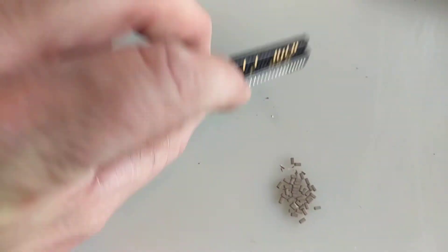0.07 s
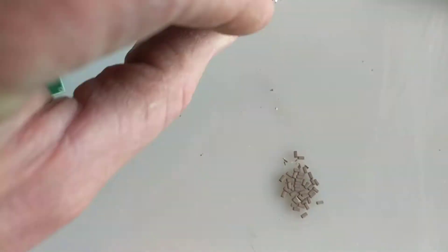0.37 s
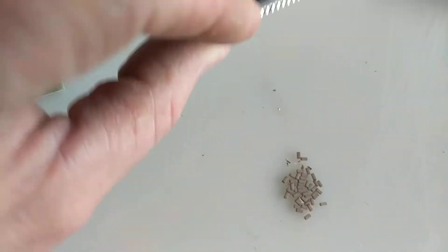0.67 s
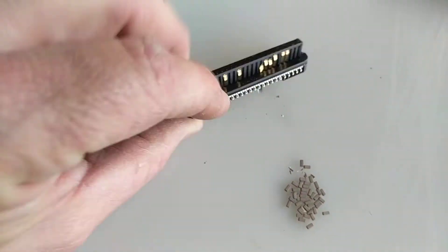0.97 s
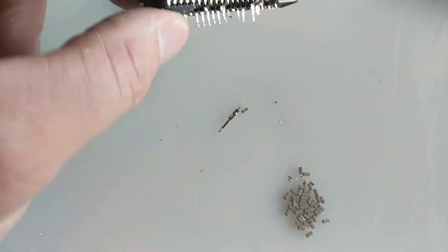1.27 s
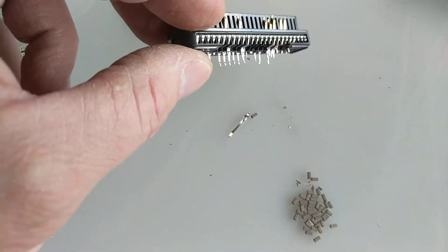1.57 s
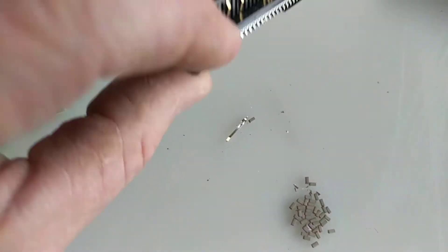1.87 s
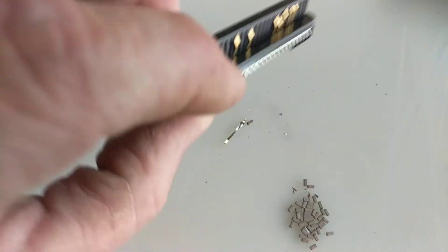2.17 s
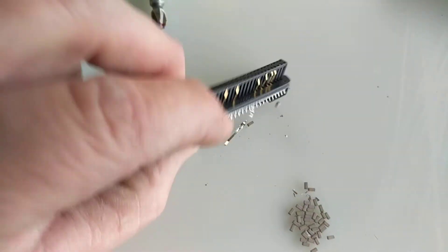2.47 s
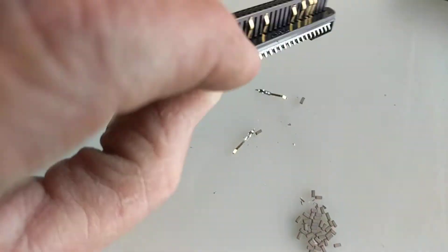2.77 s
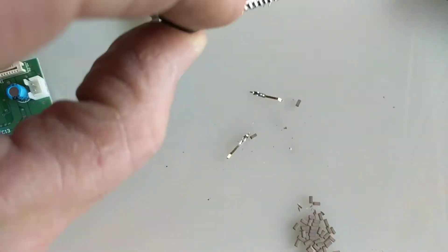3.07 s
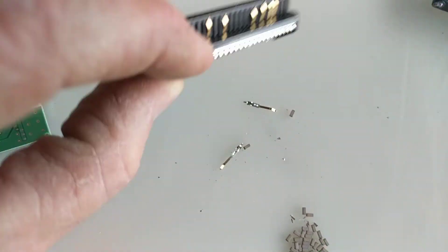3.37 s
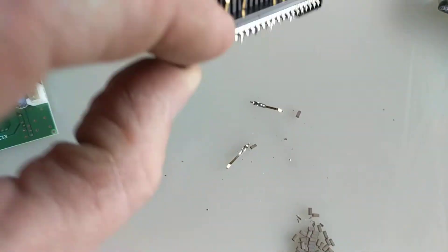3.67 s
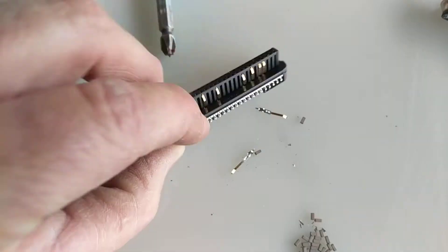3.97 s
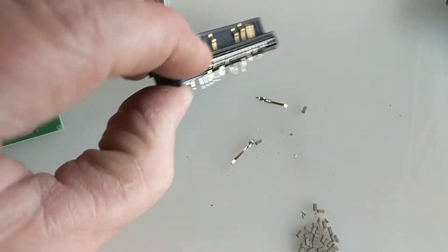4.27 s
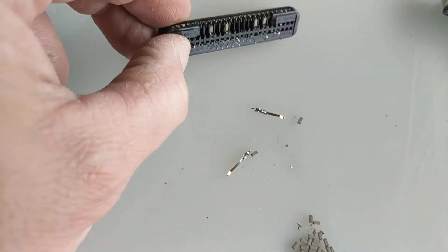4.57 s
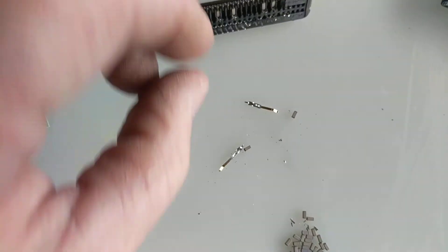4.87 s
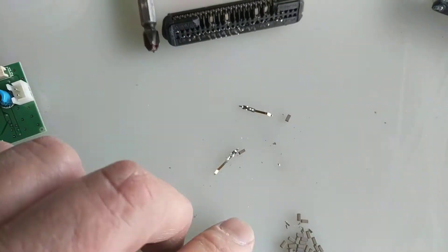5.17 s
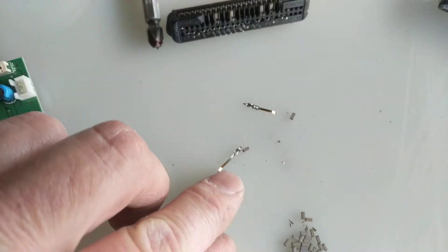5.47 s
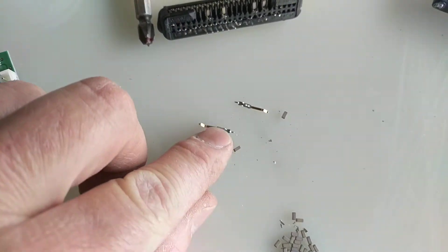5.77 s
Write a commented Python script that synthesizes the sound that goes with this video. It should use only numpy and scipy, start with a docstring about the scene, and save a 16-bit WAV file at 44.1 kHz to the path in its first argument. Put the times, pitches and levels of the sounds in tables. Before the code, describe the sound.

A hard plastic connector knocks sharply on a tabletop in three runs, loose metal pins rattling and dropping out, then clacks down.

```python
"""Sharp knocks of a hard plastic connector insert on a tabletop, in three runs, close by in a small room.
Each knock cracks, rings the table's modes and rattles the metal pins; a few pins drop out and skitter.
A faint, fluttering high hiss swells while the insert is handled. The insert clacks down against a steel
tool, which rings faintly, and the hand slides over the table to a pin. A low, steady noise lies beneath."""
import sys
import numpy as np
from scipy import signal
from scipy.fft import rfft, irfft, next_fast_len
from scipy.io import wavfile

SR = 44100
rng = np.random.default_rng(int(sys.argv[2]) if len(sys.argv) > 2 else 0)


def wav_record(signal):
    """Record a signal, one row per channel, as 16-bit PCM in the file named by sys.argv[1]."""
    frames = np.transpose(np.atleast_2d(signal))
    bounded = np.clip(frames, -1, 1)
    # unit amplitude maps onto the largest positive 16-bit level
    quanta = np.round(bounded * 32767).astype(np.int16)
    wavfile.write(sys.argv[1], SR, quanta)


N = 265217
TIME = np.arange(N) / SR


def from_db(db):
    return 10 ** (np.asarray(db) / 20)


def unit_rms(x):
    return x / np.sqrt(np.mean(x ** 2) + 1e-20)


def decay(t, t60):
    return np.exp(-np.log(1000) * t / t60)


def add(track, start_s, sound):
    """Mix a sound into the track."""
    at = max(round(start_s * SR), 0)
    track[at:at + len(sound)] += sound[:max(N - at, 0)]


def colour(x, spectrum):
    """Minimum-phase filter with the given spectral shape and unit mean power gain."""
    size = next_fast_len(len(x) + 2048, real=True)
    size += size % 2
    hz, db = np.transpose(spectrum)
    bins_hz = np.fft.rfftfreq(size, 1 / SR)
    gain = unit_rms(from_db(np.interp(np.log(bins_hz + 1), np.log(hz), db)))
    cepstrum = irfft(np.log(gain))
    cepstrum[1:size // 2] *= 2
    cepstrum[size // 2 + 1:] = 0
    return irfft(rfft(x, size) * np.exp(rfft(cepstrum)))[:len(x)]


def ring(modes, size, stretch=1, spread_db=0):
    """Struck modes: decaying sines of alternating sign."""
    t = np.arange(size) / SR
    out = np.zeros(size)
    for k, (hz, db, t60) in enumerate(modes):
        gain = (-1) ** k * from_db(db + spread_db * rng.normal())
        out += gain * np.sin(2 * np.pi * hz * stretch * t) * decay(t, t60)
    return out


def burst(t60, size=4096):
    """Dense contact vibration, decaying from rms 1."""
    envelope = decay(np.arange(size) / SR, t60)
    return unit_rms(rng.standard_normal(size) * envelope) * np.sqrt(np.mean(envelope ** 2))


def crack(t60, click_share=0.5):
    """Hard contact: energy split between one click and a decaying burst."""
    tail = burst(t60)
    click = signal.unit_impulse(len(tail)) * np.linalg.norm(tail)
    return np.sqrt(1 - click_share) * tail - np.sqrt(click_share) * click


# background spectrum: f/Hz, relative level/dB
BACKGROUND_SPECTRUM = [(15, -50.5), (25, -32.5), (42, -6.5), (70, 4), (127, -8.5), (200, -11), (249, -17),
                       (301, -17), (516, -22.5), (1070, -20.5), (2410, -33.5), (2990, -32.5), (5280, -37.5),
                       (7510, -40), (16000, -41)]
def background(level_db=-56.5):
    """Steady noise, mostly low rumble."""
    return from_db(level_db) * unit_rms(colour(rng.standard_normal(N), BACKGROUND_SPECTRUM))


# swells of the hiss: t/s, length/s, level/dB
HISS_SWELLS = [(1.05, 0.7, -74), (2.42, .42, -67.5), (3.3, .25, -67), (3.6, 1, -80), (5.26, .12, -60),
               (5.85, 0.24, -65.5)]
# high hiss: f/Hz, relative level/dB
HISS_SPECTRUM = [(2000, -12.5), (4000, -10), (6000, -2.5), (8000, -10), (10500, 8.5), (12000, -4),
                 (15000, 9), (16500, -5.5)]
def high_hiss(floor_db=-70, flutter_db=6.5, flutter_points_per_s=170):
    """Faint, fluttering hiss near 10.5 and 15 kHz, swelling while the insert is handled."""
    points = np.minimum(rng.standard_normal(2000), 1.8)
    flutter = np.interp(TIME * flutter_points_per_s, np.arange(2000), points)
    hiss = unit_rms(colour(rng.standard_normal(N) * from_db(flutter_db * flutter), HISS_SPECTRUM))
    return (from_db(floor_db) + swell_gain(HISS_SWELLS)) * hiss


def swell_gain(swells, ramp_s=0.079):
    """Sum of swells with linear rise and fall."""
    return sum(from_db(db) * np.clip(np.minimum(TIME - s, s + length_s - TIME) / ramp_s, 0, 1)
               for s, length_s, db in swells)


# reverberation: f/Hz, gain/dB, t60/s
REVERB_BANDS = [(100, -6, 1), (250, -15, 0.67), (500, -4.5, 0.38), (850, -10, 0.4), (1400, -10, 0.34),
                (2570, -10.5, 0.29), (3730, -14, 0.28), (7400, -15.5, 0.19), (14570, -17.5, 0.28)]
def room(x, first_echo_s=0.0035, size=32768):
    """Diffuse reflections in half-octave bands, bass lasting longest; each call is a new spot."""
    t, hz = np.arange(size) / SR, np.fft.rfftfreq(size, 1 / SR)
    points_hz, db, t60 = np.transpose(REVERB_BANDS)
    white, response = rfft(rng.standard_normal(size)), 0
    onset = np.clip(t / first_echo_s - 1, 0, 1)
    edges_hz = np.geomspace(70, 18000, 17)
    for low, high in zip(edges_hz, edges_hz[1:]):
        band = (hz >= low) & (hz < high)
        log_centre = np.log(low * high) / 2
        band_t60 = np.interp(log_centre, np.log(points_hz), t60)
        band_db = np.interp(log_centre, np.log(points_hz), db)
        tail = irfft(white * band) * decay(t, band_t60) * onset
        response += from_db(band_db) * unit_rms(tail) * np.sqrt(band.mean() / size)
    return signal.fftconvolve(x, response)[:N]


# room resonances: f/Hz, relative level/dB, t60/s
STANDING_MODES = [(204.4, -43, 0.94), (230, -50.5, 1), (416.4, -50, 0.68), (474, -49.5, 0.58),
                  (618, -46, 0.15), (660, -45, 0.27), (760, -47.5, 0.42), (755, -49.5, 0.26),
                  (850, -53.5, 0.55), (1100, -48.5, 0.11), (1408, -46.5, 0.39), (1645, -50.5, 0.56),
                  (2325, -51.5, 0.28)]
def standing_waves(knocks):
    """Each knock excites the room's modes, as far as it spreads into the room."""
    out, hum = np.zeros(N), ring(STANDING_MODES, size=40000)
    for s, force_db, *_, room_db in knocks:
        add(out, s, from_db(force_db + room_db) * hum)
    return out


# hand sliding towards a pin: t/s, length/s, level/dB
PALM_STROKES = [(5.27, 0.666, -64)]
# hand-on-table friction: f/Hz, relative level/dB
PALM_SPECTRUM = [(150, -9.5), (330, 1), (700, -13), (1100, -11), (1550, -3.5), (2000, -23), (4000, -18.5),
                 (9000, -29)]
def palm():
    """The soft side of the hand brushes the tabletop with a dull hush."""
    return swell_gain(PALM_STROKES) * unit_rms(colour(rng.standard_normal(N), PALM_SPECTRUM))


# heel of the hand landing after a knock: t/s, level/dB
THUDS = [(0.748, -23), (0.9910, -32.5)]
# hand-on-table modes: f/Hz, relative level/dB, t60/s
HAND_MODES = [(65, -1.5, 0.065), (127, -8.5, .06)]
def hand_thuds():
    """Flesh meets the table: a soft, short boom."""
    out = np.zeros(N)
    for s, db in THUDS:
        add(out, s, from_db(db) * ring(HAND_MODES, size=8000))
    return out


# pin in its slot: f/Hz, level/dB, t60/s
PIN_SLOT_MODES = [(5800, -59, 0.0079), (10370, -52.5, 0.0028), (14300, -45.5, 0.0032)]
def shifting_pins(start_s=1.19, end_s=1.72, count=26):
    """As the insert is turned over, loose pins tick in their slots, each at its own pitch."""
    out = np.zeros(N)
    for s in rng.uniform(start_s, end_s, count):
        add(out, s, ring(PIN_SLOT_MODES, size=1024, stretch=1 + 0.0752 * rng.normal(), spread_db=0.5))
    return out


# pin landings and bounces: t/s, level/dB
PIN_LANDINGS = [(.9120, -46), (1.0026, -35), (1.0450, -38), (1.0607, -29), (1.071, -43), (1.0911, -41),
                (1.1176, -35), (1.1405, -54), (1.1567, -33), (1.1780, -41.5), (2.4648, -52), (2.5369, -42),
                (2.574, -41), (2.5787, -29), (2.6176, -43), (4.045, -34.5), (4.4203, -39)]
# pin tick: f/Hz, relative level/dB
PIN_SPECTRUM = [(1500, -33), (3000, -9.5), (4200, 0), (5500, -3), (7000, -2.5), (9000, -3), (12000, 3),
                (15500, -1)]
def dropped_pins():
    """Loose pins hit the tabletop with tiny bright ticks."""
    out = np.zeros(N)
    for s, db in PIN_LANDINGS:
        add(out, s, from_db(db) * burst(t60=0.0068))
    return colour(out, PIN_SPECTRUM)


# insert tipped and laid down, then fingertip on a pin: t/s, clack/dB, bump/dB, room send offset/dB
LIGHT_CONTACTS = [(4.4143, -44.5, -27, -5), (4.4963, -34.5, -39.5, 0.5), (4.5246, -47, -47.5, -8),
                  (4.5489, -44, -45, 0), (4.633, -48.5, -47, 8), (4.64, -36, -43, 2.5),
                  (4.6547, -23, -34.5, 0.5), (4.6654, -33, -30.5, 4), (4.6883, -42, -42, 2),
                  (4.73, -33, -42, -8), (4.7388, -14, -24.5, -5), (4.761, -30.5, -33.5, -4),
                  (5.4348, -56, -79, -5), (5.566, -46.5, -58, -3)]
# bright clack of the insert: f/Hz, relative level/dB
CLACK_SPECTRUM = [(600, -1.5), (1500, 1.5), (2700, 3.5), (3800, 1.5), (5100, 1.5), (6500, 2.5), (8500, -6),
                  (11000, -7.5), (16000, -18)]
# dull bump of the table: f/Hz, relative level/dB
BUMP_SPECTRUM = [(60, -10), (150, -1.5), (350, 5), (700, -4), (1400, -5.5), (2200, -18.5), (4000, -35)]
# hard edge of the insert ringing: t/s, f/Hz, level/dB, t60/s
EDGE_RINGS = [(4.4973, 2740, -34, 0.017), (4.7388, 4970, -5.5, 0.0036)]
# steel tool ringing: t/s, f/Hz, level/dB, t60/s
TOOL_RINGS = [(4.6390, 12600, -57, .3), (4.6543, 7850, -52, .42), (4.7386, 4134, -53, .42)]
def laying_down(clack_send_db=19.0, bump_send_db=23.5):
    """Light contacts clack the insert, bump the table and echo; some ring an edge or the steel tool."""
    clack, bump, rings, clack_send, bump_send = np.zeros((5, N))
    for s, clack_db, bump_db, room_db in LIGHT_CONTACTS:
        add(clack, s, from_db(clack_db) * crack(t60=0.016, click_share=0.24))
        add(bump, s, from_db(bump_db) * crack(t60=0.04, click_share=0.3))
        add(clack_send, s, from_db([clack_db + room_db + clack_send_db]))
        add(bump_send, s, from_db([bump_db + room_db + bump_send_db]))
    for s, hz, db, t60 in EDGE_RINGS + TOOL_RINGS:
        add(rings, s, ring([(hz, db, t60)], size=24000))
    direct = colour(clack, CLACK_SPECTRUM) + colour(bump, BUMP_SPECTRUM) + rings
    radiated = colour(clack_send, CLACK_SPECTRUM) + colour(bump_send, BUMP_SPECTRUM)
    return direct + room(radiated)


def rattle(clicks_per_s, t60, size=4096):
    """Pins clatter in their slots: random clicks of decaying strength."""
    hits = rng.random(size) < clicks_per_s / SR
    clicks = hits * rng.uniform(0.54, 1, size) * rng.choice([-1, 1], size)
    clatter = signal.fftconvolve(clicks, burst(t60=0.0017))[:size]
    return unit_rms(clatter) * decay(np.arange(size) / SR, t60)


# radiation of the whole top: f/Hz, relative level/dB
TABLETOP_SPECTRUM = [(70, -9.5), (200, 5.5), (500, -5), (850, 1.5), (1400, 0), (2600, 5.5), (3200, -1.5),
                     (4200, -6.5), (6000, -11.5), (10000, -18.5), (15000, -23.5)]
def tabletop(gain_db, size):
    """Bending waves spread over the top, which radiates a pulse into the room."""
    return from_db(gain_db) * colour(signal.unit_impulse(size), TABLETOP_SPECTRUM)


# stiff first push of the contact: f/Hz, relative level/dB, t60/s
PUSH_MODES = [(2520, -0.5, 0.0028), (900, -1, 0.0011)]
# insert and tabletop ringing together: f/Hz, relative level/dB, t60/s
BODY_MODES = [(158, -34, 0.17), (230, -36.5, 0.15), (323, -28.5, 0.057), (396.5, -40.5, 0.13),
              (457, -24.5, 0.013), (562, -26, 0.052), (681.6, -18.5, 0.02), (737, -27, 0.0449),
              (980, -30, 0.052), (1017, -26.5, 0.038), (1082, -30, 0.097), (1140, -29, 0.11),
              (1318, -17, 0.016), (1410, -19, 0.06), (1495, -40.5, 0.09), (1636, -32.5, 0.11),
              (1714, -30, 0.092), (1770, -26, 0.034), (2149, -12.5, 0.019), (2309, -4, 0.008),
              (2312, -6.5, 0.013), (2500, -26.5, 0.067), (2670, -12.5, 0.014), (2940, -19.5, 0.016),
              (3327, -20.5, 0.016), (3890, -31, 0.02)]
# sway of the whole table: f/Hz, relative level/dB, t60/s
THUMP_MODES = [(43.4, -2.5, .8), (58.3, 0.5, 0.58), (124, 0, 0.99)]
# snap of the plastic: f/Hz, relative level/dB
SNAP_SPECTRUM = [(1500, -16), (2400, 6), (3400, 5.5), (4800, -0.5), (6500, -4.5), (8000, -10.5),
                 (10000, -13)]
# bright crack of plastic and pins: f/Hz, relative level/dB
CRACK_SPECTRUM = [(3000, -17.5), (6000, -2), (8500, -6), (10700, 0), (12000, -4), (14500, -3.5),
                  (16500, -3.5)]
def knock(force_db, snap_db, crack_db, rattle_db, thump_db, pin_flight_s=0.0038, size=40000):
    """One knock as body (push, ringing table, thump) and treble (snap, crack, pins falling back)."""
    body, snap, bright = np.zeros((3, size))
    grip_detune = 1 + rng.normal() / 400
    push = -ring(PUSH_MODES, size=12000)
    ringing = ring(BODY_MODES, size=12000, stretch=grip_detune, spread_db=2.8)
    add(body, 0, from_db(force_db) * (push + ringing))
    add(body, 0, from_db(thump_db) * ring(THUMP_MODES, size=size))
    add(snap, 0, from_db(snap_db) * crack(t60=0.013))
    add(bright, 0, from_db(crack_db) * crack(t60=0.012))
    add(snap, pin_flight_s, from_db(rattle_db) * rattle(clicks_per_s=670, t60=0.027))
    add(bright, pin_flight_s, from_db(rattle_db) * rattle(clicks_per_s=2400, t60=0.012))
    return body, colour(snap, SNAP_SPECTRUM) + colour(bright, CRACK_SPECTRUM)


# knocks on the table: t/s, force/dB, snap/dB, crack/dB, rattle/dB, thump/dB, room send offset/dB
TABLE_KNOCKS = [(0.0121, -3.5, -22.5, -16.5, -29, -53.5, 3), (0.2456, -3, -22, -19.5, -27, -50.5, 2),
                (0.4939, -1.5, -16.5, -18, -35, -49, 0), (0.7334, -2.5, -18, -19.5, -28, -47, 2.5),
                (0.9663, -2.5, -17.5, -19.5, -32.5, -47.5, 4), (1.9420, -1.5, -20.5, -16, -33.5, -57.5, -2),
                (2.2202, -2, -17, -28, -49.5, -53, -1.5), (2.4314, -3, -16, -24, -42.5, -60, 2.5),
                (2.6505, -2.5, -14, -21.5, -47, -58, 4.5), (3.2445, -3.5, -25, -13, -34, -54, 2.5),
                (3.5108, -2, -25, -17, -24.5, -52.5, 3.5), (3.7329, -4, -16, -16.5, -42, -55, 4),
                (3.948, -3.5, -18.5, -17.5, -29.5, -59, 7.5), (4.141, -4.5, -28, -14.5, -32, -53, -2.5)]
def knocking(body_send_db=-10.5, snap_send_db=8.5, crack_send_db=14.5, size=40000):
    """Knocks sound directly and into the room, where the treble of all directions sums to a click."""
    out, top = np.zeros(N), tabletop(gain_db=8.0, size=size)
    snap_click = colour(signal.unit_impulse(size), SNAP_SPECTRUM)
    crack_click = colour(signal.unit_impulse(size), CRACK_SPECTRUM)
    for s, force_db, snap_db, crack_db, rattle_db, thump_db, room_db in TABLE_KNOCKS:
        body, treble = knock(force_db, snap_db, crack_db, rattle_db, thump_db)
        radiated = (from_db(body_send_db) * body + from_db(force_db) * top
                    + from_db(snap_db + snap_send_db) * snap_click
                    + from_db(crack_db + crack_send_db) * crack_click)
        add(out, s, body + treble)
        add(out, s, from_db(room_db) * room(radiated))
    return out


def scene(small_send_db=1.0):
    """Background, hiss, handling, loose pins and knocks in a small room; mono."""
    small_sounds = dropped_pins() + shifting_pins() + high_hiss()
    air = background()
    knocks = knocking() + standing_waves(TABLE_KNOCKS)
    handling = hand_thuds() + laying_down() + palm()
    small_echoes = from_db(small_send_db) * room(small_sounds)
    return (air + handling + small_sounds + small_echoes + knocks)[None]


def record(dry):
    """Band limit: 36 Hz to 15.9 kHz."""
    bass_cut = signal.butter(6, 36, "high", fs=SR, output="sos")
    top_cut = signal.ellip(8, 0.3, 80, 15900, fs=SR, output="sos")
    return signal.sosfilt(top_cut, signal.sosfilt(bass_cut, dry))


dry = scene()
out = record(dry)
wav_record(out)
```